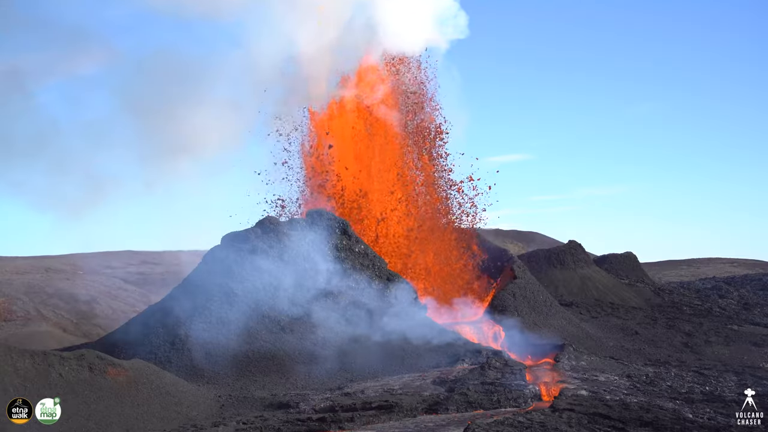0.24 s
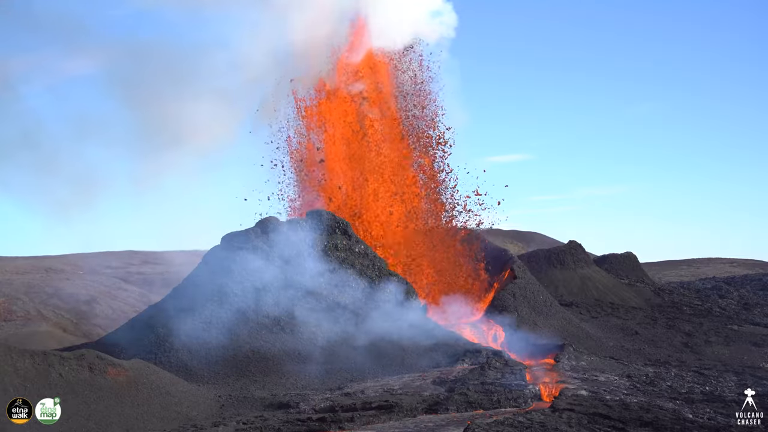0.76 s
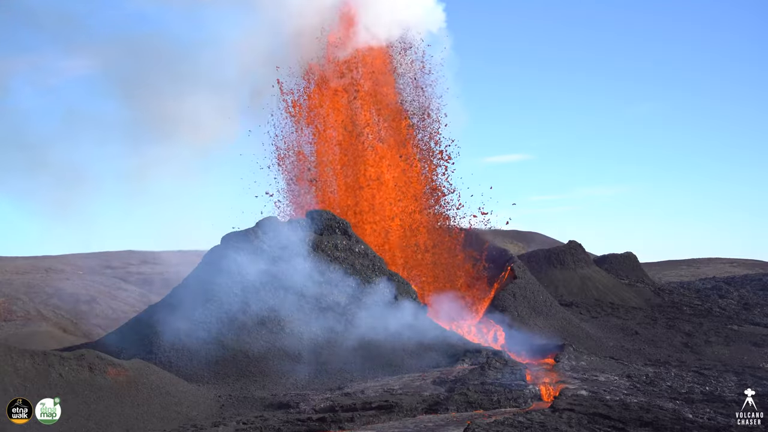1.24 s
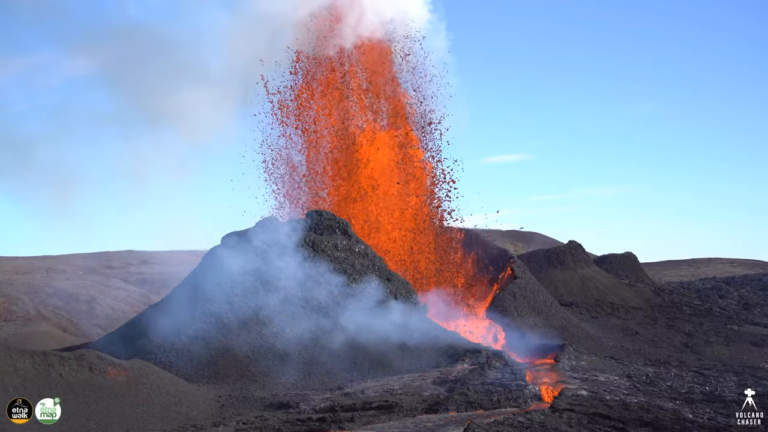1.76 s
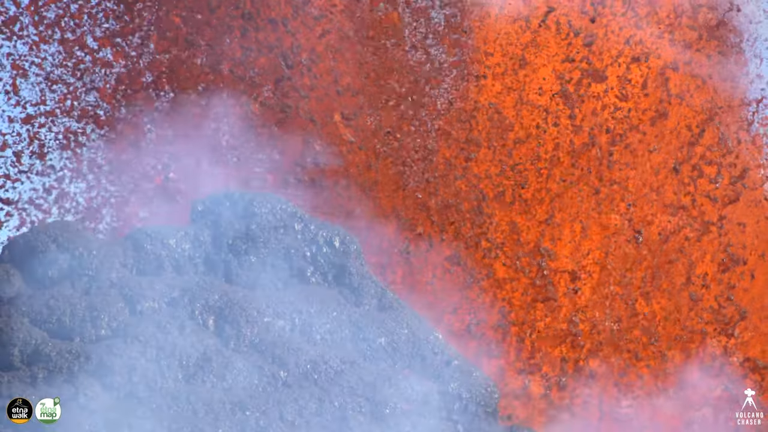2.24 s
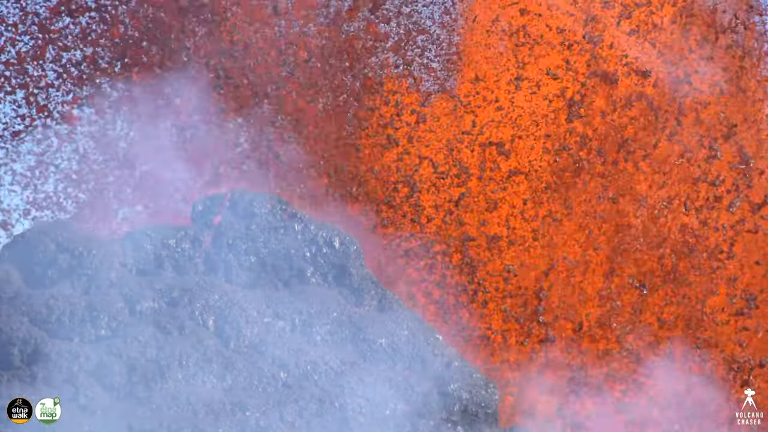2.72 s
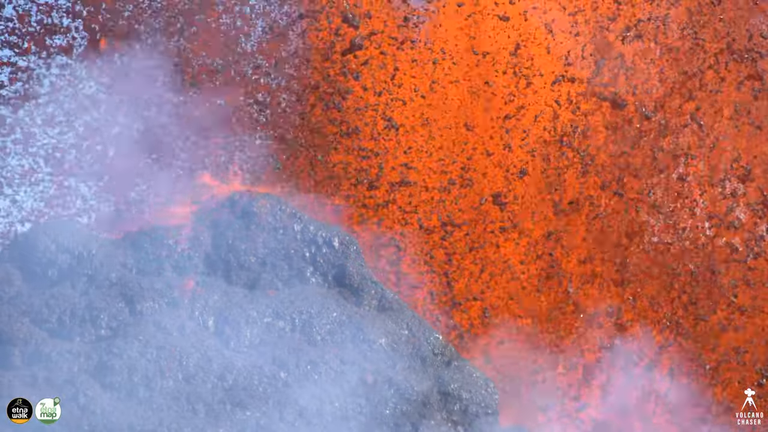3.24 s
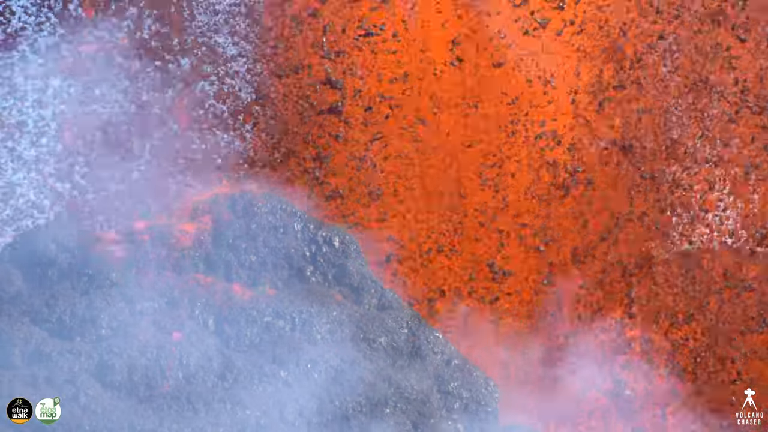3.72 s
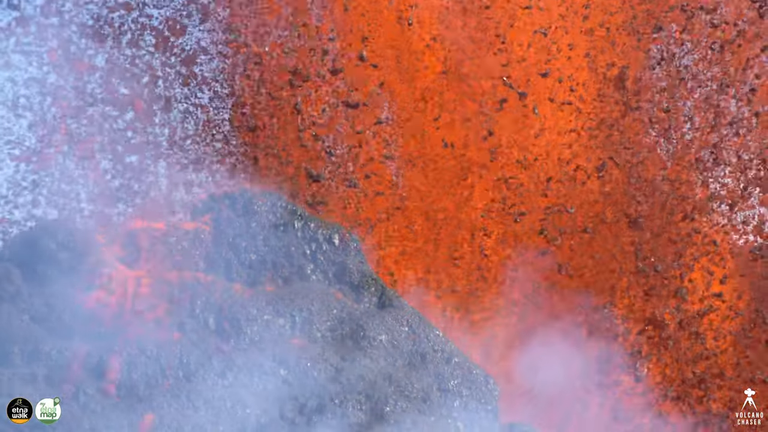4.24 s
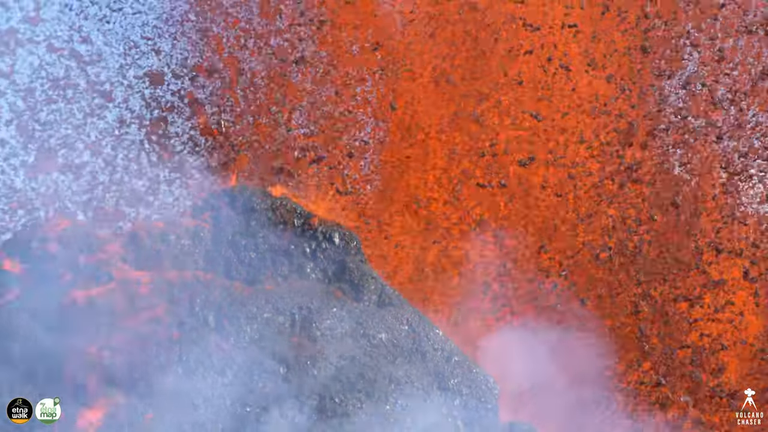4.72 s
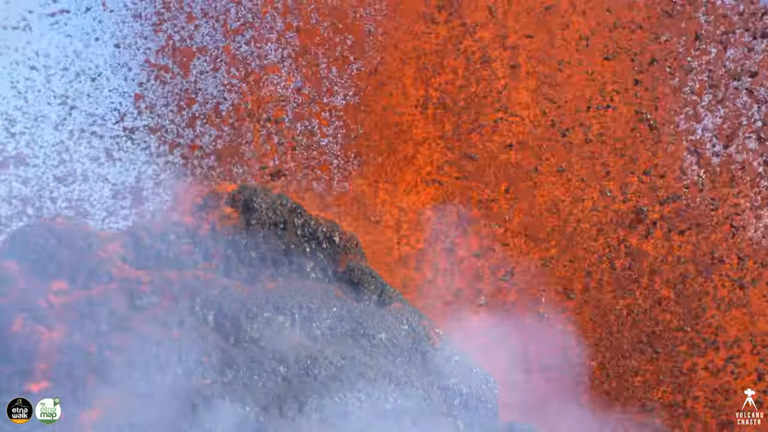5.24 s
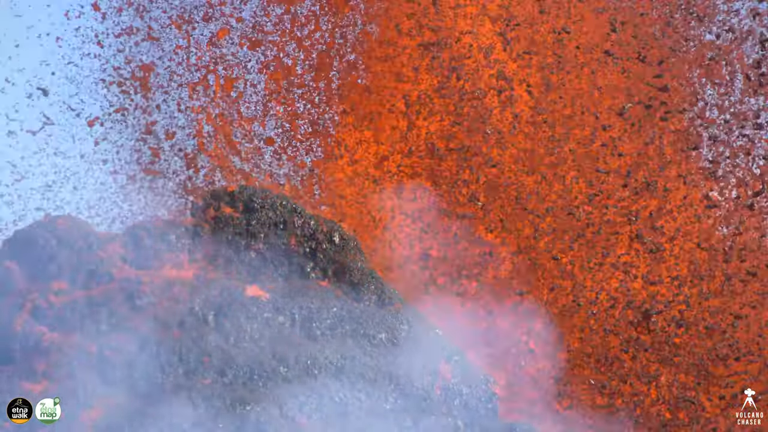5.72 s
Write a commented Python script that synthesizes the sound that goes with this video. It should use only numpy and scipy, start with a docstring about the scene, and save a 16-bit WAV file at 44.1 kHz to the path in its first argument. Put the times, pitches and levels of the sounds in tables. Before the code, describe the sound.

A distant lava fountain rumbles, roars and rushes steadily, growing louder, with light wind buffeting the microphone.

```python
"""A deep rumble, a roar and a rush are heard first: a lava fountain some hundred metres from a camera.
Big swirls in the crater rumble, the gas jet roars and countless flying lumps of lava make the rush.
The air takes the treble away. Close by, light gusts buffet the two microphone openings over a faint
hiss, and a few small ticks sound. The fountain surges, eases, then grows to full strength."""
import sys
import numpy as np
from scipy import signal
from scipy.fft import rfft, irfft, next_fast_len
from scipy.io import wavfile
from scipy.ndimage import uniform_filter1d, map_coordinates

SR = 44100
rng = np.random.default_rng(int(sys.argv[2]) if len(sys.argv) > 2 else 0)


def pcm_store(signal):
    """Save signal as 16-bit PCM."""
    levels = np.round(np.clip(np.atleast_2d(signal), -1, 1) * 32767)
    wavfile.write(sys.argv[1], SR, levels.astype(np.int16).T)


N = 263277

# The tone of each noise, from bass to treble. Each row: frequency in Hz, relative level in dB.
HEAVE_TONE = [(10, -22), (22, -6), (36, -1), (55, 0), (75, -6), (130, -35), (600, -120)]
RUMBLE_TONE = [(30, -20.5), (52, -8.5), (72, 0), (110, 1.5), (145, -1.5), (178, -4.5), (200, -15.5),
               (400, -63.5), (1500, -120)]
ROAR_TONE = [(100, -26.5), (190, -3), (240, -0.5), (320, 0.5), (470, -1.5), (640, -7), (850, -10.5),
             (1300, -20), (2200, -44.5), (4000, -80.5), (8000, -120)]
SPRAY_TONE = [(300, -25), (700, -1), (1000, 0.5), (1300, 0.5), (1600, -5), (2000, -11.5), (2600, -18),
              (3200, -27), (4000, -39), (5000, -53), (12000, -120)]
WIND_TONE = [(8, -4), (18, -1), (42, 0), (60, -3.5), (85, -11), (160, -20), (500, -50), (2000, -120)]
HISS_TONE = [(1000, 0), (5000, -4.5), (11500, -5), (12800, -19)]
# How the fountain leans to one side. Each row: frequency in Hz, left level minus right in dB.
LEFT_LOUDER = [(60, 1.2), (140, 1.8), (220, -.5), (330, -1), (510, -1.7), (770, -1.2), (1200, -1.5),
               (1820, -1.5), (2400, -.5)]
# How far its left wave runs ahead of the right. Each row: frequency in Hz, lead in radians.
LEFT_AHEAD = [(30, -.08), (130, -.11), (195, -.38), (270, -.18), (570, -.19), (660, .2), (860, -.2),
              (1080, .07), (1700, -.08), (2000, .22), (2400, 0)]
# Stereo width of the far noise; above about 2 kHz the sound is nearly mono. Each row: frequency in Hz, gain of
# the widening noise in dB.
STEREO_WIDTH = [(30, -20), (110, -27), (200, -18), (300, -26), (620, -17), (750, -22), (870, -18),
                (1300, -22), (1900, -16), (2400, -24)]
# How strongly the crater rumbles. Each row: time in seconds, level in dB.
CRATER_LEVEL = [(0, -43.5), (1.05, -40), (1.85, -44), (2.45, -39.5), (2.9, -39), (3.3, -37), (4.6, -37.5),
                (5.97, -38)]
# How hard the fountain blows. Each row: time in seconds, level in dB.
FOUNTAIN_FORCE = [(0, -52), (0.35, -48.5), (0.9, -47), (1.65, -49.5), (2.1, -48.5), (2.8, -49.5),
                  (3.65, -45.5), (4.2, -46), (4.9, -44.5), (5.35, -44.9), (5.97, -44.3)]
# Gusts at the microphone. Each row: time of the peak in seconds, strength in dB.
WIND_GUSTS = [(0.18, -45.5), (0.97, -40.5), (2.0, -37.5), (2.3, -36), (2.92, -37.5)]
# Ticks close by. Each row: start in seconds, strength in dB, left minus right in dB, low edge in Hz.
NEAR_TICKS = [(0.5417, -51.5, 5, 6000), (0.6414, -57.5, 3, 5500), (1.802, -46, 14, 5570),
              (2.4912, -56, 1, 2600), (2.6948, -50, 5, 2200), (2.9347, -57, 2.5, 5000),
              (4.2448, -32, 16, 1300), (5.022, -53.5, 3, 5000), (5.6555, -57, 1, 4000)]
# Big bubbles of gas. Each row: peak time and length in seconds, change of roar and of rumble in dB.
GAS_BUBBLES = [(0.802, 0.35, 2.5, 0.5), (4.28, 0.22, 0, 1.5), (4.915, 0.26, 2.5, 3),
               (5.564, 0.074, -0.5, 4)]


def gain(db):
    """Turn decibels into a number to multiply by."""
    return 10 ** (np.asarray(db) / 20)


def at_frequency(table, hz):
    """Read a table between its rows, with frequency spaced by octaves."""
    row_hz, values = np.transpose(table)
    return np.interp(np.log(hz + 1), np.log(row_hz + 1), values)


def over_time(table):
    """Join a table's rows with straight lines, giving one value per sample."""
    times, values = np.transpose(table)
    return np.interp(np.arange(N) / SR, times, values)


def wobble(rate):
    """A smooth curve through `rate` random points a second."""
    points = rng.standard_normal(int(N * rate / SR) + 4)
    return map_coordinates(points, [np.arange(N) * rate / SR])


def filtered(sound, response):
    """Multiply each frequency in a sound by response(hz)."""
    size = next_fast_len(N + SR // 2)
    hz = np.fft.rfftfreq(size, 1 / SR)
    return irfft(rfft(sound, size) * response(hz), size)[..., :N]


def steady_noise(tone):
    """Noise with the given tone, its strength held near 1 over each quarter second."""
    noise = filtered(rng.standard_normal(N), lambda hz: gain(at_frequency(tone, hz)))
    power = np.abs(uniform_filter1d(noise ** 2, size=SR // 4))
    return noise / np.sqrt(power + 1e-20)


def distant_noise(tone):
    """Far noise in stereo: one wave on both sides, plus a weaker noise that widens it."""
    def left_and_right(hz):
        left = gain(at_frequency(LEFT_LOUDER, hz) / 2) * np.exp(.5j * at_frequency(LEFT_AHEAD, hz))
        return np.array([left, 1 / left])  # each side takes half the difference

    middle = steady_noise(tone)
    width = filtered(steady_noise(tone), lambda hz: gain(at_frequency(STEREO_WIDTH, hz)))
    return filtered(np.array([middle + width, middle - width]), left_and_right)


def crater_rumble(heave_db=-7, heave_grows=1.25, swell_db=1.5, rumble_db=0.4, throb_db=0.36):
    """The largest swirls rumble at the mouth of the vent; the column of gas heaves slowly with them."""
    _, bubble_db = gas_bubbles()
    level_db = over_time(CRATER_LEVEL) + bubble_db
    heave_level_db = level_db.mean() + heave_grows * (level_db - level_db.mean())
    heave = gain(heave_level_db + heave_db + swell_db * wobble(6.6)) * distant_noise(HEAVE_TONE)
    rumble = gain(level_db + rumble_db + throb_db * wobble(19)) * distant_noise(RUMBLE_TONE)
    return heave + rumble


def gas_jet(roar_db=7.5, roar_grows=1.15, fade_db_per_s=0.19, churn_db=1.08):
    """The gas roars and churns with the fountain's force, slowly giving way to the spray."""
    force_db = over_time(FOUNTAIN_FORCE)
    bubble_db, _ = gas_bubbles()
    level_db = force_db.mean() + roar_grows * (force_db - force_db.mean())
    level_db -= fade_db_per_s * np.arange(N) / SR
    return gain(level_db + roar_db + bubble_db + churn_db * wobble(7.6)) * distant_noise(ROAR_TONE)


def lava_spray(spray_db=-1.58, flutter_db=0.34, treble_hz=1900, brightening=0.14, treble_db_per_s=0.97):
    """Countless lumps of lava blend into a rush, brighter with force and as the fountain climbs."""
    t = np.arange(N) / SR
    force_db = over_time(FOUNTAIN_FORCE)
    treble_db = brightening * (force_db - force_db.mean()) + treble_db_per_s * (t - t.mean())
    rush = distant_noise(SPRAY_TONE)
    treble = filtered(rush, lambda hz: hz ** 4 / (hz ** 4 + treble_hz ** 4))
    rush = rush + (gain(treble_db) - 1) * treble
    return gain(force_db + spray_db + flutter_db * wobble(7.4)) * rush


def wind_strength(rise_s=0.09, fall_s=0.2, breeze_db=-54):
    """The wind's strength in dB: each gust rises quickly and dies away over a steady breeze."""
    t = np.arange(N) / SR
    power = gain(breeze_db) ** 2
    for peak_s, db in WIND_GUSTS:
        shape = np.exp(np.minimum((t - peak_s) / rise_s, (peak_s - t) / fall_s))
        power += (gain(db) * shape) ** 2
    return 10 * np.log10(power)


def wind_buffet(left_db=-1.5, right_db=-6.5, lumpy_db=1.2, shared_db=-9):
    """Gusts buffet each microphone opening on its own; the left faces the wind and gets more."""
    wind_db = wind_strength()
    sides = [gain(wind_db + side_db + lumpy_db * wobble(19)) * steady_noise(WIND_TONE)
             for side_db in (left_db, right_db)]
    shared = gain(wind_db + shared_db) * steady_noise(WIND_TONE)  # the largest swirls press on both
    return np.array(sides) + shared


def faint_hiss(hiss_db=-87.0, wind_follow=0.25, smooth_s=0.7, sides_db=-5, flicker_db=1.0):
    """A faint, flickering hiss at the microphone rises a little in gusty spells."""
    wind_db = uniform_filter1d(wind_strength(), size=int(smooth_s * SR))
    level_db = hiss_db + wind_follow * (wind_db - wind_db.mean()) + flicker_db * wobble(17)
    sides = np.array([steady_noise(HISS_TONE), steady_noise(HISS_TONE)])
    shared = steady_noise(HISS_TONE)
    return gain(level_db) * (shared + gain(sides_db) * sides)


def grit_ticks(boost_db=3, bounce_s=.0057, bounce_db=-16, high_hz=9000):
    """Dry ticks, like grit touching the camera, each with one small bounce."""
    out = np.zeros((2, N))
    for start_s, db, pan_db, low_hz in NEAR_TICKS:
        taps = np.zeros(N)
        taps[round(start_s * SR)] = 1
        taps[round((start_s + bounce_s) * SR)] = gain(bounce_db)
        band = signal.butter(1, [low_hz, high_hz], "bandpass", fs=SR, output="sos")
        side_gains = gain(db + boost_db + np.array([pan_db, -pan_db]) / 2)
        out += np.outer(side_gains, signal.sosfilt(band, taps))
    return out


def gas_bubbles():
    """Each big bubble of gas makes one smooth swell. Gives the change in dB of roar, then rumble."""
    t = np.arange(N) / SR
    change_db = np.zeros((2, N))
    for peak_s, length_s, roar_db, rumble_db in GAS_BUBBLES:
        swell = np.exp(-(2 * (t - peak_s) / length_s) ** 2)
        change_db += np.outer([roar_db, rumble_db], swell)
    return change_db


def scene():
    """The far fountain and the small sounds at the camera, added together."""
    return crater_rumble() + gas_jet() + lava_spray() + wind_buffet() + faint_hiss() + grit_ticks()


def record(dry):
    """The camera cuts off the highest treble steeply."""
    top_hz = 13000
    return filtered(dry, lambda hz: 1 / (1 + (hz / top_hz) ** 40))


dry = scene()
out = record(dry)
pcm_store(out)
```